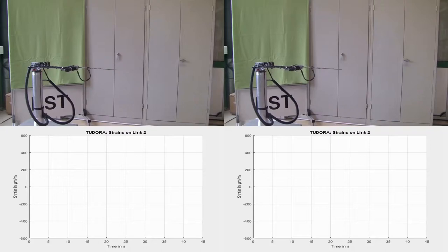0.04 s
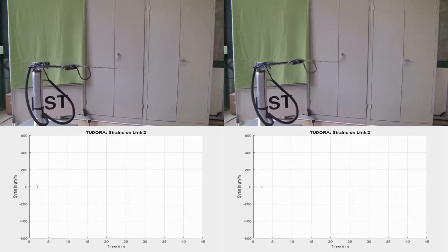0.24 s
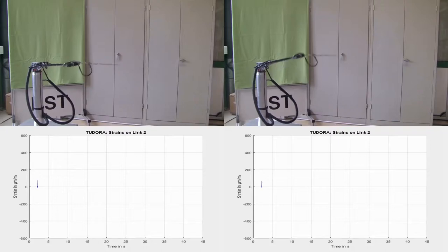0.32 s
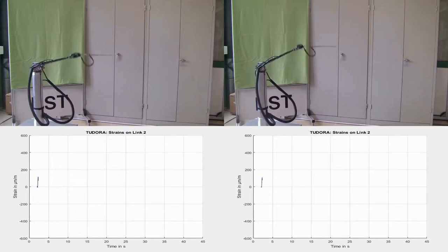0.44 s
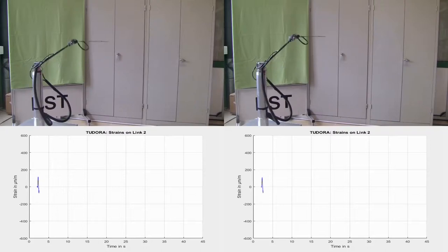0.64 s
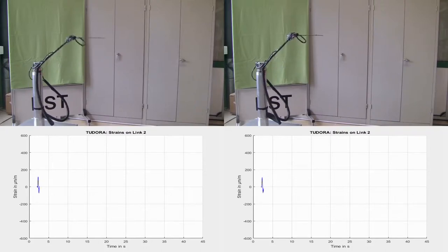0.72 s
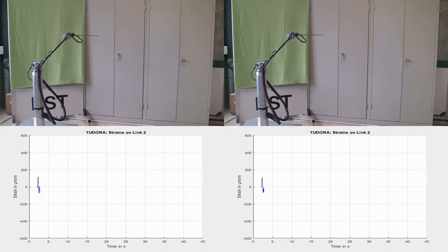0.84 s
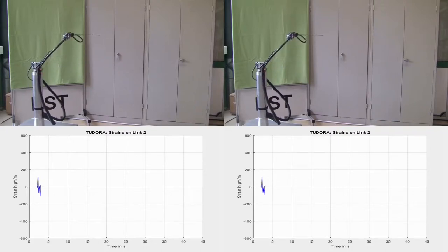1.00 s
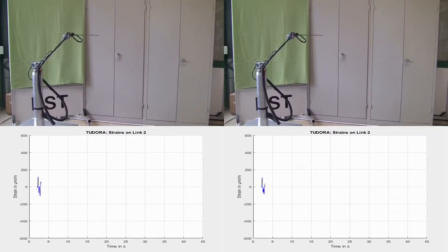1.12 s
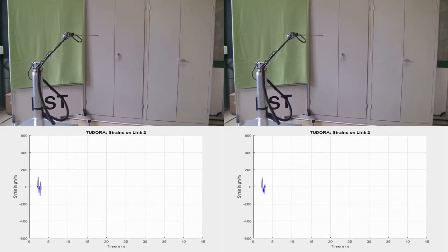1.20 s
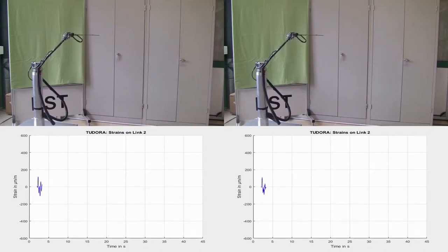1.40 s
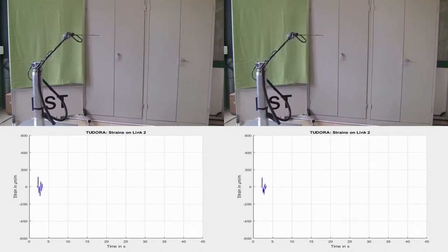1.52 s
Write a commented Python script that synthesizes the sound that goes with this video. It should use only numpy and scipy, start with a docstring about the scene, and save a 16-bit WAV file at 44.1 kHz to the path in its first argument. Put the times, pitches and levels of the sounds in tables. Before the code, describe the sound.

A robot arm's geared drive runs up with a rough whir, knocks, grinds and chatters on one note, then slows with clacks and a low hum, over fan hiss in a small lab, recorded in stereo nearby.

```python
"""Cooling fans hiss in a quiet lab; then a robot arm lifts its link: the geared drive runs up, grinds, coasts down.
Uneven tooth contacts ring the housing and the case, gear flanks scrape, and overtones follow the gear stages.
Slack knocks as the load comes on, and at speed the gear chatters on one note.
Loose teeth clack and the link hums while braking; a faint servo tone stays over the fans.
Fans and scraping are filtered noise, ringing is noise through resonances, and tones are sine waves."""
import sys
import numpy as np
from scipy import signal
from scipy.fft import rfft, irfft
from scipy.io import wavfile
from scipy.ndimage import uniform_filter1d

SR = 44100
rng = np.random.default_rng(int(sys.argv[2]) if len(sys.argv) > 2 else 0)


def file_out(sig):
    """Save sig as 16-bit WAV at sys.argv[1]."""
    # one column per channel
    cols = np.atleast_2d(sig).T
    # limit, then scale
    lim = np.clip(cols, -1, 1)
    pcm = np.round(lim * 32767).astype(np.int16)
    wavfile.write(sys.argv[1], SR, pcm)


N = 68355  # length in samples, 1.55 s


def undb(db):
    """Decibels to gain."""
    return 10 ** (np.asarray(db) / 20)


def unit(x):
    """Scale to rms 1."""
    return x / np.sqrt(np.mean(x ** 2))


def curve(rows, axis=1):
    """One column of a time table, joined by straight lines."""
    rows = np.array(rows)
    return np.interp(np.arange(N) / SR, rows[:, 0], rows[:, axis])


def since(at):
    """Seconds since a moment, 0 before it."""
    return np.maximum(np.arange(N) / SR - at, 0)


def walk(rate):
    """Slow random wander of rms 1, with about `rate` new values per second."""
    hold = int(SR / rate)
    steps = np.repeat(rng.standard_normal(N // hold + 1), hold)
    return unit(uniform_filter1d(steps, hold)[:N])


def sine(hz):
    """A sine wave that follows a changing frequency."""
    return np.sin(2 * np.pi * np.cumsum(hz) / SR)


def shape(x, response):
    """Filter by a function of frequency."""
    f = np.maximum(np.arange(N + 1) * SR / (2 * N), 1)
    return irfft(rfft(x, 2 * N) * response(f))[..., :N]


def colour(f, points):
    """Gain of an outline given as frequency in Hz and level in dB."""
    hz, db = np.array(points).T
    return undb(np.interp(np.log(f), np.log(hz), db))


def mode(f, hz, width):
    """Response of one resonance, 1 at its centre."""
    return 1 / (1 + 1j * (f * f - hz * hz) / (f * width))


def ring(push, modes):
    """A pushed part rings in its resonances, added with alternating signs; rms 1."""
    def response(f):
        return sum((-1) ** k * undb(db) * mode(f, hz, width) for k, (hz, width, db) in enumerate(modes))
    return unit(shape(push, response))


def treble(x, hz):
    """The part of a sound above a gentle corner."""
    return shape(x, lambda f: 1 / (1 + np.square(np.square(hz / f))))


def pan(db):
    """Left and right gains for a level difference, left over right."""
    return undb(np.array([[db], [-db]]) / 2)


# Colour of the fans and room air. Each row: frequency in Hz, relative level in dB.
FAN_COLOUR = [(25, -17), (60, -5.5), (100, -7), (155, 2), (240, -2.5), (310, 4), (500, -2), (750, 2),
              (1050, -2.5), (1500, -7), (2200, -9.5), (2800, -9.5), (3600, -14.5), (4800, -18.5),
              (8000, -20.5), (11000, -24), (14000, -23.5), (15800, -30)]
# Stereo width of the fan air. Each row: frequency in Hz, side over middle in dB.
FAN_WIDTH = [(30, -8), (80, -5), (170, -3), (350, 2), (750, -1), (1200, -3), (2800, -3), (5500, -1),
             (12000, 0)]
# How the treble of the air changes. Each row: time in seconds, change in dB.
HISS_CHANGE = [(.0, -19), (.1, 2), (.2, 1), (.9, -5), (1.08, -5), (1.17, -5.5), (1.23, -2), (1.34, -3.5),
               (1.42, 2.5), (1.47, -1.5), (1.52, 3)]
FANS_DB, FANS_DRIFT_DB, HISS_HZ = -52.5, 0.93, 3100


def fans():
    """Turbulent fan air is noise, different on each side, with a slightly drifting level."""
    mid, side = shape(rng.standard_normal((2, N)), lambda f: colour(f, FAN_COLOUR))
    side = shape(side, lambda f: colour(f, FAN_WIDTH))
    level = undb(FANS_DB + FANS_DRIFT_DB * walk(18.24))
    air = np.array([mid + side, mid - side]) / np.std(mid) * level
    return air + treble(air, HISS_HZ) * (undb(curve(HISS_CHANGE)) - 1)


# Strength of the reflections. Each row: frequency in Hz, gain in dB.
ROOM_COLOUR = [(100, -6), (180, 17.5), (350, -6), (700, -8), (1100, -9.5), (2800, -7), (5500, -5.5),
               (9000, 3), (14000, 4)]
ROOM_T60_S = 0.12  # time for the reflections to fall by 60 dB


def room(x):
    """Short diffuse reflections from the cupboards and walls, as a fading noise tail."""
    t = np.arange(N) / SR
    fade = np.exp(-np.log(1000) * t / ROOM_T60_S)
    tail = rng.standard_normal((2, N)) * fade * (t > .002)
    wet = signal.fftconvolve(x[None], unit(tail) / np.sqrt(N), axes=1)[:, :N]
    return shape(wet, lambda f: colour(f, ROOM_COLOUR))


# The servo tone. Each row: time in seconds, pitch in Hz, level in dB before SERVO_DB is added.
SERVO_TONE = [(.0, 3946, -99), (.5, 3820, -64), (.9, 3940, -71), (.93, 3943, -68), (.954, 3943, -59.5),
              (.975, 3920, -72), (1.03, 3946, -74), (1.055, 3946, -68), (1.074, 3946, -79),
              (1.086, 3948, -60), (1.108, 3950, -61), (1.128, 3958, -78), (1.155, 3960, -76),
              (1.175, 3962, -64), (1.256, 3958, -60), (1.295, 3953, -63.5), (1.315, 3950, -74),
              (1.354, 3946, -74), (1.38, 3948, -64.5), (1.405, 3948, -67), (1.418, 3948, -73),
              (1.435, 3946, -60.5), (1.47, 3946, -61), (1.515, 3942, -69), (1.55, 3950, -69)]
SERVO_DB, SERVO_FLUTTER_DB, SERVO_PHASE_RAD = 0.5, 1, .35


def servo():
    """A thin tone from the motor current, fluttering differently on each side."""
    phase = 2 * np.pi * np.cumsum(curve(SERVO_TONE)) / SR
    sides = []
    for _ in range(2):
        tone = unit(np.sin(phase + SERVO_PHASE_RAD * walk(24.1)))
        sides.append(tone * undb(SERVO_FLUTTER_DB * walk(27.9)))
    return np.array(sides) * undb(curve(SERVO_TONE, axis=2) + SERVO_DB)


# Loudness of the link's hum and rumble. Each row: time in seconds, level in dB.
HUM_LEVEL = [(.0, -98), (.42, -70), (.49, -70), (.54, -58), (.6, -66), (.69, -59.5), (.75, -65),
             (.785, -52), (.845, -55), (.878, -51), (.91, -55), (.945, -59), (.978, -51), (1.04, -58.5),
             (1.1, -63), (1.25, -76), (1.55, -77)]
# Resonances of the link that rumble with its hum. Each row: frequency in Hz, width in Hz, level in dB.
LINK_MODES = [(214.3, 29, -10.5), (306.6, 34, -7), (326, 4.4, -4), (393, 57, -11), (432.6, 19, -5.5)]
HUM_HZ, HUM_WOBBLE, HUM_FLUTTER_DB = 178.8, 0.0041, 2  # wobble as a share of the pitch
RUMBLE_DB, RUMBLE_SIDE = 1, .6  # rumble over the shared level, and its stereo share


def hum():
    """The long link hums on one wavering note and rumbles in its resonances as the drive brakes."""
    note = unit(sine(HUM_HZ * (1 + HUM_WOBBLE * walk(14.0)))) * undb(HUM_FLUTTER_DB * walk(34.7))

    def response(f):
        return sum(undb(db) * mode(f, hz, width) ** 2 for hz, width, db in LINK_MODES)
    mid, side = shape(rng.standard_normal((2, N)), response)
    rumble = np.array([mid + RUMBLE_SIDE * side, mid - RUMBLE_SIDE * side])
    return (note + unit(rumble) * undb(RUMBLE_DB)) * undb(curve(HUM_LEVEL))


GRAINS_PER_S = 7000  # average number of tiny slips


def grains(spread_db):
    """Surfaces in contact make dense tiny slips of uneven size and random sign."""
    slips = rng.random(N) < GRAINS_PER_S / SR
    size = undb(spread_db * np.minimum(rng.exponential(size=N), 4))
    return unit(slips * rng.choice([-1, 1], N) * size)


# Loose teeth clack as the drive coasts down. Each row: time in seconds, strength in dB.
CLACK_TIMES = [(0.744, -43), (0.894, -47), (0.977, -50), (1.031, -47), (1.061, -46), (1.104, -48),
               (1.122, -48), (1.195, -53), (1.273, -53)]
# Resonances of the housing, also rung by the grinding. Each row: frequency in Hz, width in Hz, level in dB.
HOUSING_MODES = [(566, 8.7, -9), (681, 29.5, -1.5), (728, 12.5, 2), (788, 38, -1.5), (832, 15, -1.5),
                 (935, 22.7, 3), (1013, 48, 1.5), (1060, 23, -7), (1092, 17, -14.5), (1171.5, 31, 3),
                 (1274, 42, -5), (1385, 50, -8)]
# Colour of rubbing gear flanks, also used by the scrape. Each row: frequency in Hz, relative level in dB.
FLANK_COLOUR = [(100, -35), (220, -27), (330, -2.5), (520, -3.5), (900, 5.5), (1500, -1.5), (2100, -2.5),
                (2400, -5), (3300, -11), (4700, -12.5), (5900, -13), (6700, -20), (9200, -25.5),
                (10500, -33), (14500, -35), (16000, -47)]
CLACK_DECAY_S, CLACK_TICK_DB = .012, -20  # tick level against the housing
GRIND_GRAIN_DB, BRIGHT_HZ = 3, 3400  # slip spread, and the corner of the gear treble


def clacks():
    """Loose teeth rattle the housing in short dying bursts, each with a faint treble tick."""
    bursts = sum(undb(db) * (since(at) > 0) * np.exp(-since(at) / CLACK_DECAY_S)
                 for at, db in CLACK_TIMES)
    push = grains(GRIND_GRAIN_DB)
    tick = unit(shape(push, lambda f: colour(f, FLANK_COLOUR)))
    tick = unit(treble(tick, BRIGHT_HZ)) * undb(CLACK_TICK_DB)
    return bursts * (ring(push, HOUSING_MODES) + tick)


# Knocks as the gear slack closes. Each row: start in seconds, peak strength in dB.
KNOCK_TIMES = [(.330, -26), (.354, -28.5), (.383, -28), (.389, -27.5), (.402, -28.5), (.4365, -28),
               (.449, -24.5)]
KNOCK_PUSH_S = .0018  # each swell peaks after twice this time


def knocks():
    """Slack closes with cushioned blows: each is a swell that dies within milliseconds."""
    swells = 0
    for at, db in KNOCK_TIMES:
        t = since(at) / KNOCK_PUSH_S
        swells = swells + undb(db) * np.square(t / 2) * np.exp(2 - t)
    return swells


# Chatter of the main housing resonance. Each row: time in seconds, pitch in Hz, level in dB.
CHATTER_NOTE = [(.32, 1010, -90), (.43, 1035, -70), (.441, 1035, -38), (.451, 1035, -31), (.462, 1033, -30),
                (.492, 1038, -34), (.528, 1040, -31.5), (.565, 1022, -32), (.612, 1036, -33),
                (.625, 1042, -35.5), (.655, 1035, -33.5), (.686, 1028, -33), (.712, 1020, -50),
                (.76, 1020, -90)]
CHATTER_WOBBLE, CHATTER_DEPTH, CHATTER_LOCK_HZ = .005, .55, 45  # pitch share, throb depth, band width
TOOTH_HZ, TOOTH_JITTER = 98, .17  # tooth rate at full speed, and its unevenness as a share


def chatter():
    """Knocks kick the main housing resonance, then friction sustains it, throbbing near the tooth rate."""
    note = sine(curve(CHATTER_NOTE) * (1 + CHATTER_WOBBLE * walk(61.0)))
    throb = 1 + CHATTER_DEPTH * sine(TOOTH_HZ * (1 + 2 * TOOTH_JITTER * walk(80)))
    sustained = unit(note * throb) * undb(curve(CHATTER_NOTE, axis=2))
    return sustained + note * knocks()


def lock(x):
    """While the main resonance chatters, its random ringing is taken out of a sound."""
    db = curve(CHATTER_NOTE, axis=2)
    held = np.minimum(2 * undb(db - db.max()), 1)
    loudest_hz = curve(CHATTER_NOTE)[db.argmax()]
    return x - held * shape(x, lambda f: mode(f, loudest_hz, CHATTER_LOCK_HZ))


# Joint speed, heard as scraping; also sets the tooth rate.
# Each row: time in seconds, level in dB before SCRAPE_DB is added.
SCRAPE_LEVEL = [(.0, -65.5), (.19, -57), (.228, -53.5), (.255, -44.5), (.285, -47.5), (.305, -43),
                (.34, -42), (.44, -38.5), (.51, -37.5), (.57, -37.7), (.68, -38.5), (.72, -42.5),
                (.79, -43.5), (.89, -50), (1.0, -58.5), (1.12, -61), (1.22, -81), (1.55, -91)]
SPEED_PER_DB = 0.41  # natural log of speed per dB of scraping
TOOTH_SCATTER_DB, CONTACT_SHARE = 1.8, 0.37  # uneven strength; decay time as a share of the tooth cycle


def teeth():
    """Contact force: each tooth catches and lets go, unevenly, more often at speed."""
    effort = curve(SCRAPE_LEVEL)
    rate = TOOTH_HZ * np.exp(SPEED_PER_DB * (effort - effort.max()) + TOOTH_JITTER * walk(90))
    turn = np.cumsum(rate) / SR  # teeth passed so far
    force = undb(TOOTH_SCATTER_DB * rng.standard_normal(N))[turn.astype(int)]
    return unit(force * np.exp(-(turn % 1) / CONTACT_SHARE))


# Pinion mesh as the motor runs up. Each row: time in seconds, base frequency in Hz, level in dB.
MESH_TRACK = [(.15, 335, -72), (.215, 356, -52), (.24, 374, -40), (.275, 382, -35.5), (.305, 398, -38),
              (.33, 418, -41), (.37, 440, -40.5), (.425, 451, -37.5), (.455, 462, -41), (.5, 470, -57),
              (.6, 476, -83)]
# Its overtones. Each row: multiple of the base frequency, relative level in dB.
MESH_OVERTONES = [(1.9, -2), (3, 2.5), (3.5, -7), (4, -10)]
# Whine of the second gear stage at speed. Each row: time in seconds, base frequency in Hz, level in dB.
WHINE_TRACK = [(.42, 268, -80), (.5, 275, -45), (.57, 281, -38), (.63, 292, -39.5), (.68, 299, -42),
               (.73, 303, -44), (.8, 300, -58), (.9, 290, -85)]
# Its overtones. Each row: multiple of the base frequency, relative level in dB.
WHINE_OVERTONES = [(2, -12), (5, -9), (6, -3), (7, -3)]
MESH_WOBBLE, MESH_FLUTTER_DB = .008, 2.5  # wobble as a share of the pitch


def mesh(contact, track, overtones):
    """Ragged overtones follow the speed of a gear stage and pulse with the tooth contacts."""
    phase = 2 * np.pi * np.cumsum(curve(track) * (1 + MESH_WOBBLE * walk(71.12))) / SR
    whir = sum(undb(db) * np.sin(k * phase) * undb(MESH_FLUTTER_DB * walk(49.33)) for k, db in overtones)
    soft_contact = uniform_filter1d(contact, size=90)  # smoothed over 2 ms
    return unit(whir * soft_contact) * undb(curve(track, axis=2))


# Resonances of the gear wheels. Each row: frequency in Hz, width in Hz, level over the scraping in dB.
WHEEL_MODES = [(1760, 42, 5.5), (2714, 28, 7.5), (3100, 176, 6), (5780, 420, 4.5), (7800, 160, 3.5)]
SCRAPE_DB, SCRAPE_GRAIN_DB, SCRAPE_SLIDE = 2.5, 2, 0.92  # slide is the steady part of the rubbing
BRIGHT_PER_DB = 0.08  # extra treble in dB per dB of scraping


def scrape(contact):
    """Gear flanks rub and excite the wheel resonances, brighter at speed."""
    slips = grains(SCRAPE_GRAIN_DB) * (SCRAPE_SLIDE + (1 - SCRAPE_SLIDE) * contact)

    def response(f):
        wheels = sum((undb(db) - 1) * mode(f, hz, width) for hz, width, db in WHEEL_MODES)
        return colour(f, FLANK_COLOUR) * (1 + wheels)
    rub = unit(shape(slips, response))
    effort = curve(SCRAPE_LEVEL)
    brightness = undb(BRIGHT_PER_DB * (effort - effort.max()))
    rub = rub + treble(rub, BRIGHT_HZ) * (brightness - 1)
    return rub * undb(effort + SCRAPE_DB)


# Drive effort, heard as grinding. Each row: time in seconds, level in dB before GRIND_DB is added.
GRIND_LEVEL = [(.0, -64), (.15, -60), (.215, -49), (.24, -41), (.31, -38), (.345, -37), (.375, -33.5),
               (.425, -34.5), (.47, -34), (.66, -34.8), (.712, -41), (.75, -37.5), (.81, -41), (.89, -41.7),
               (1.0, -49), (1.12, -50), (1.21, -58), (1.55, -82)]
# Resonances of the gear case. Each row: frequency in Hz, width in Hz, level in dB.
CASE_MODES = [(1650, 31, -1.5), (1700, 29, -4), (1753, 19, -8.5), (1840, 21, -4.5), (2019, 38, -8),
              (2051, 52, -8.5)]
# The case rings more as the link rises, then fades. Each row: time in seconds, level in dB.
CASE_LEVEL = [(.0, -96), (.3, -71), (.48, -49), (.57, -42), (.68, -42), (.8, -45), (.9, -54), (1.02, -61),
              (1.2, -69), (1.55, -77)]
GRIND_DB, SLIDE_SHARE = -.5, 1  # slide is the rubbing between contacts


def grind(contact):
    """Tooth contacts drive the resonances of the housing and, higher up, the gear case."""
    push = grains(GRIND_GRAIN_DB) * (contact + SLIDE_SHARE)
    housing = ring(push, HOUSING_MODES) * undb(curve(GRIND_LEVEL) + GRIND_DB)
    case = ring(push, CASE_MODES) * undb(curve(CASE_LEVEL))
    return housing + case


GRIND_PAN_DB, SCRAPE_PAN_DB = -3, -0.2  # left over right


def scene():
    """The fans, the drive with its reflections, the link and the servo tone sound together."""
    contact = teeth()
    gears = mesh(contact, MESH_TRACK, MESH_OVERTONES) + mesh(contact, WHINE_TRACK, WHINE_OVERTONES)
    body = lock(grind(contact)) + gears + clacks()
    rub = lock(scrape(contact))
    drive = (body + chatter()) * pan(GRIND_PAN_DB) + rub * pan(SCRAPE_PAN_DB)
    return fans() + room(body + rub) + servo() + hum() + drive


START_S, FADE_S, TOP_HZ = 0.07, 0.017, 15550


def record(dry):
    """After a short silence the sound fades in quickly, and a steep filter cuts the top."""
    progress = np.clip((np.arange(N) / SR - START_S) / FADE_S, 0, 1)
    opening = np.square(np.sin(np.pi / 2 * progress))
    top_cut = signal.ellip(10, .2, 80, TOP_HZ, fs=SR, output="sos")
    return signal.sosfilt(top_cut, dry * opening)


dry = scene()
out = record(dry)
file_out(out)
```